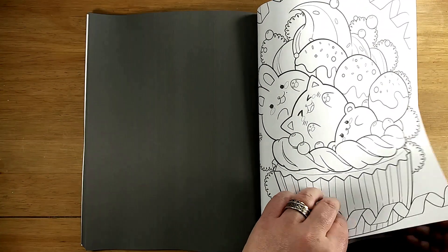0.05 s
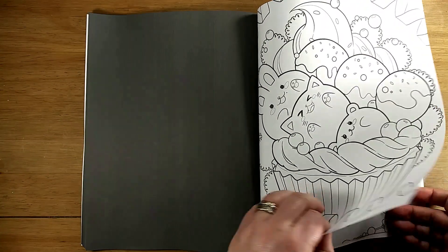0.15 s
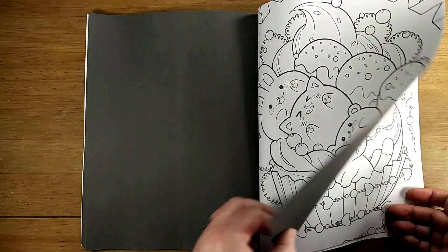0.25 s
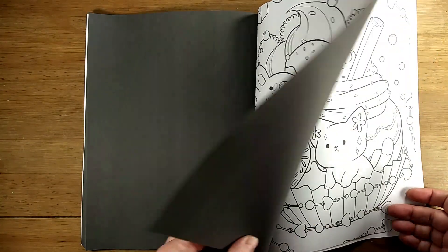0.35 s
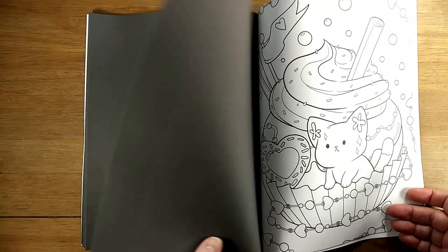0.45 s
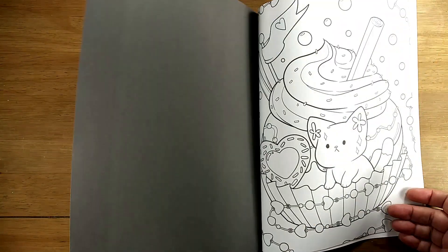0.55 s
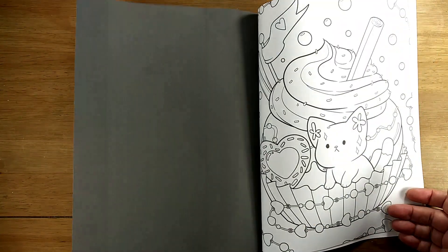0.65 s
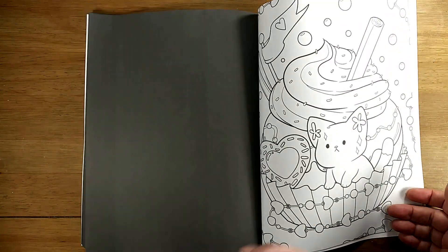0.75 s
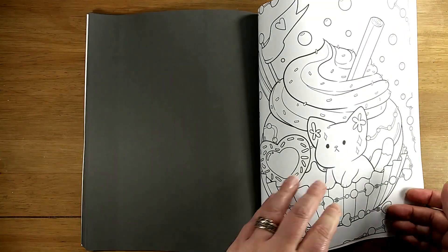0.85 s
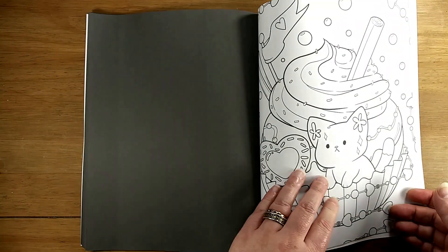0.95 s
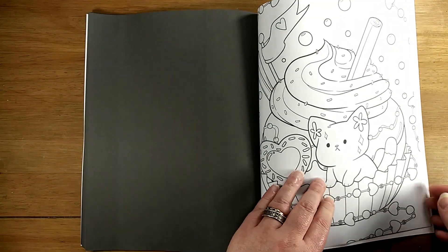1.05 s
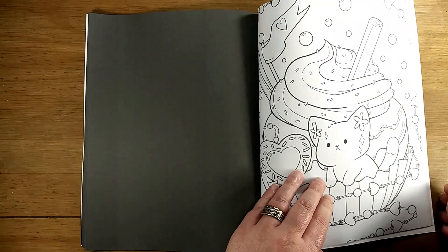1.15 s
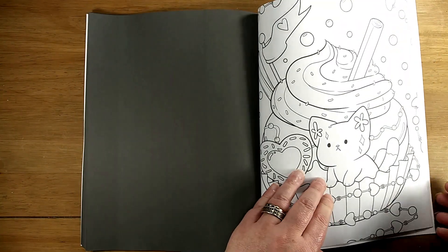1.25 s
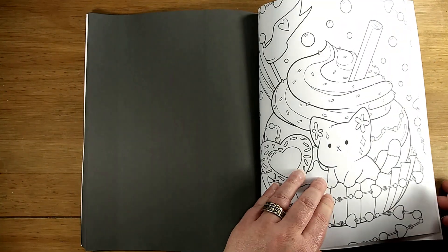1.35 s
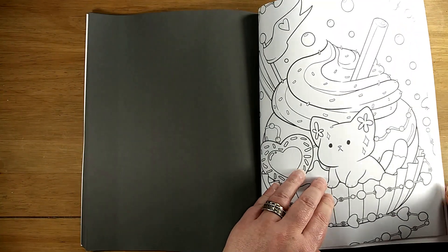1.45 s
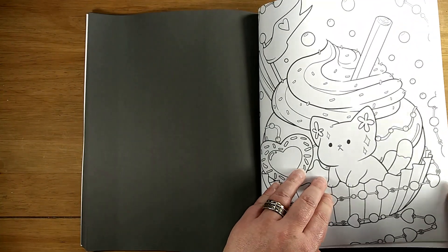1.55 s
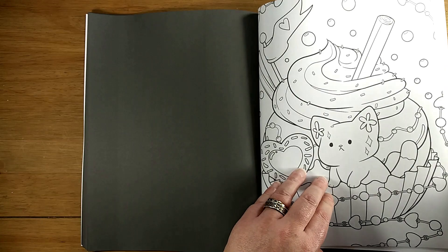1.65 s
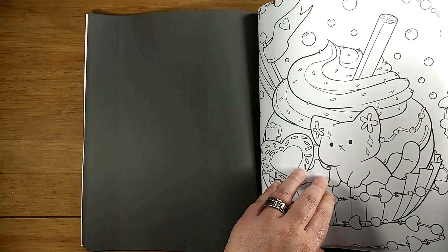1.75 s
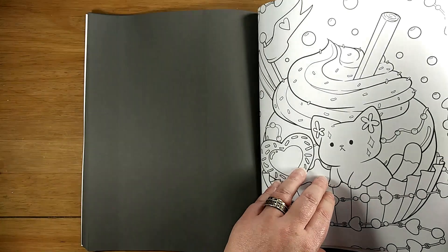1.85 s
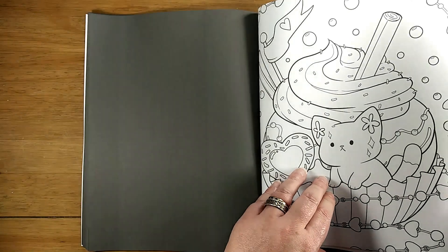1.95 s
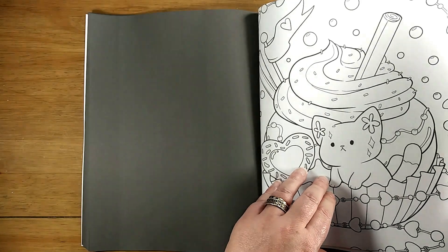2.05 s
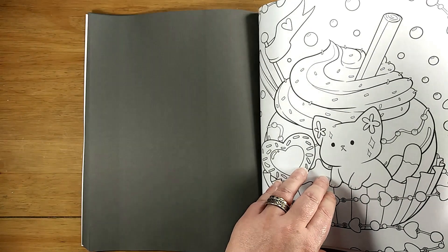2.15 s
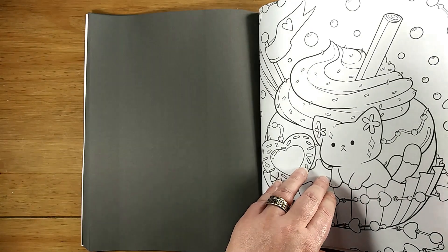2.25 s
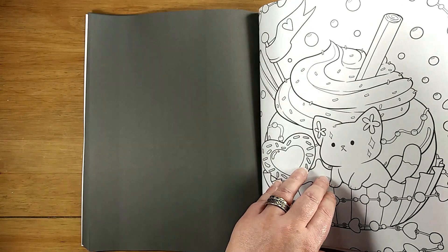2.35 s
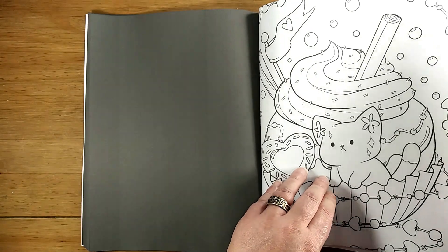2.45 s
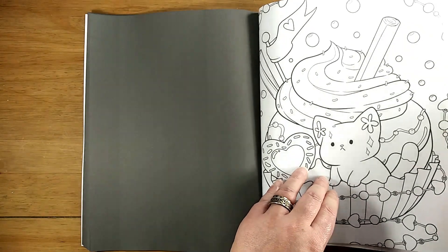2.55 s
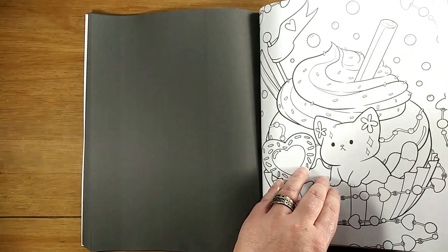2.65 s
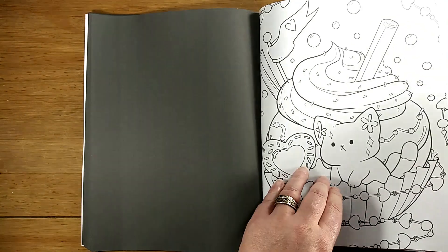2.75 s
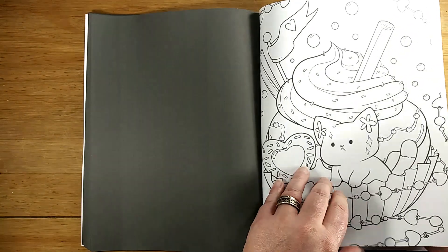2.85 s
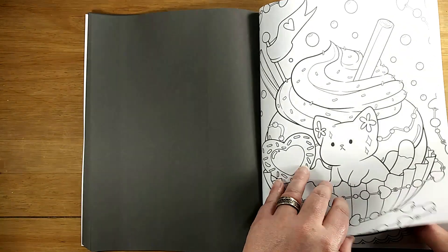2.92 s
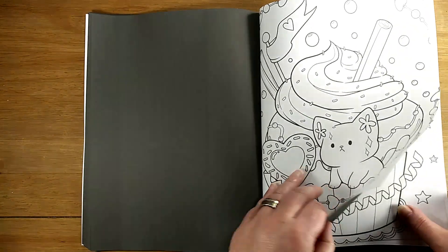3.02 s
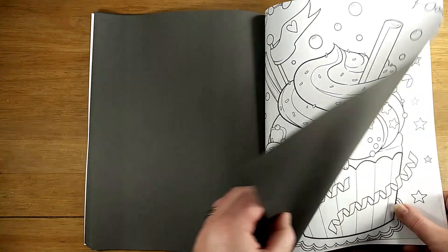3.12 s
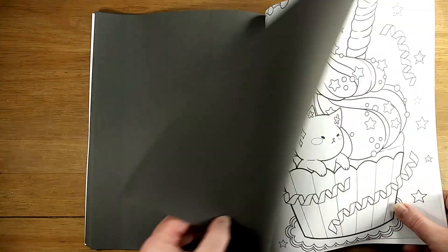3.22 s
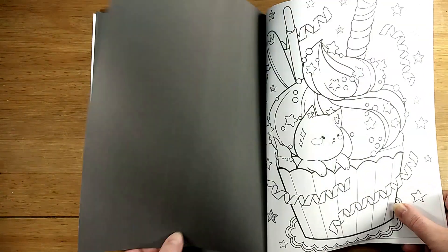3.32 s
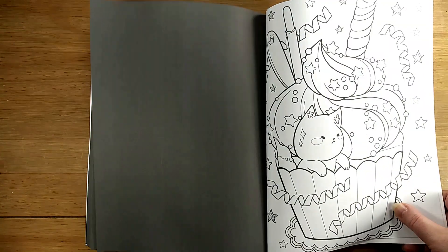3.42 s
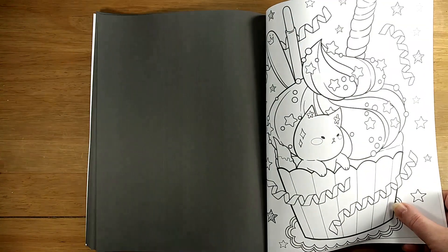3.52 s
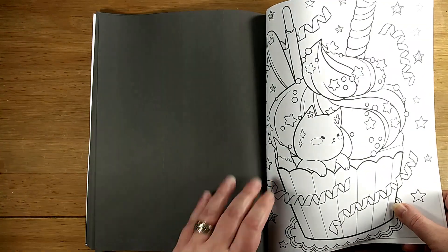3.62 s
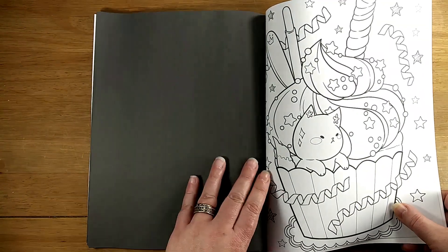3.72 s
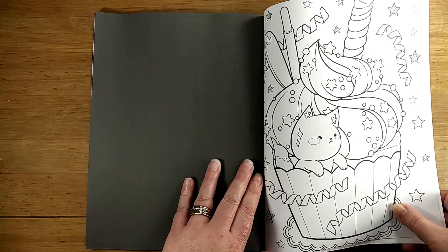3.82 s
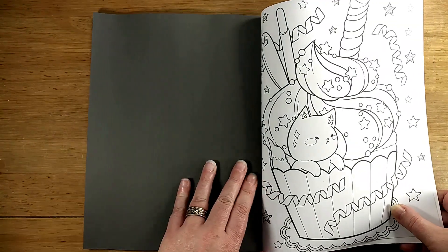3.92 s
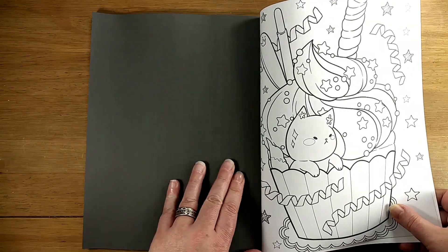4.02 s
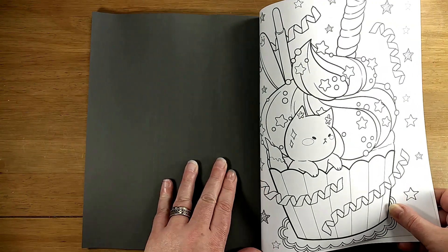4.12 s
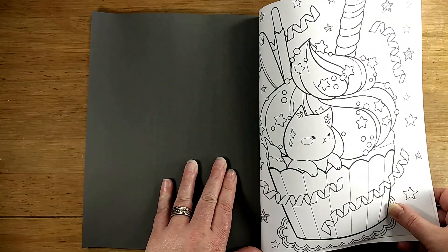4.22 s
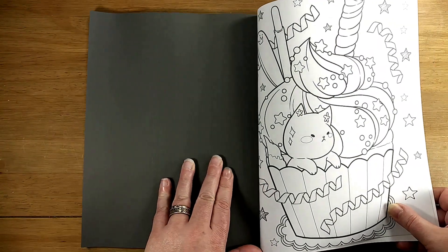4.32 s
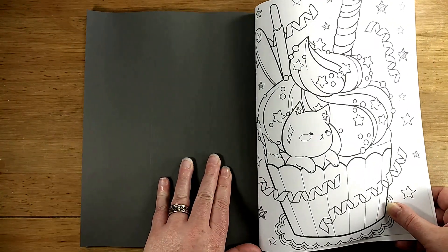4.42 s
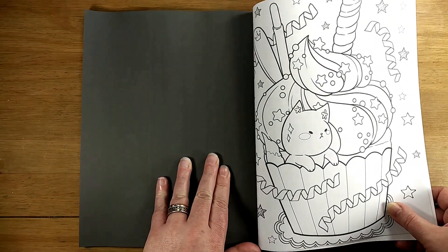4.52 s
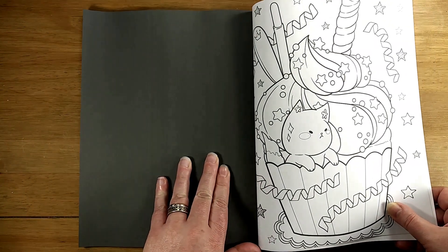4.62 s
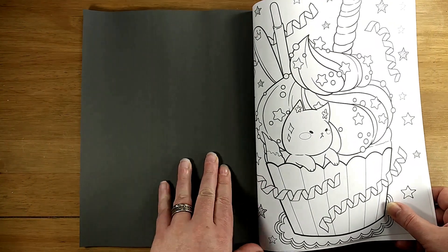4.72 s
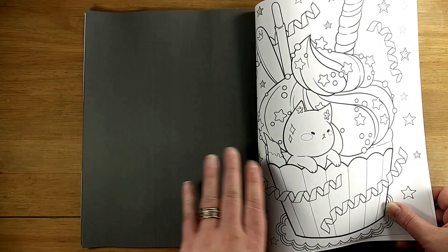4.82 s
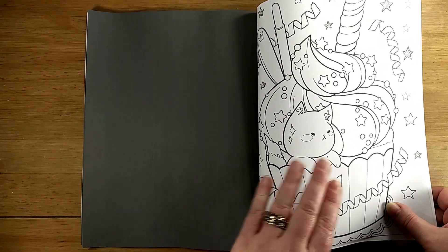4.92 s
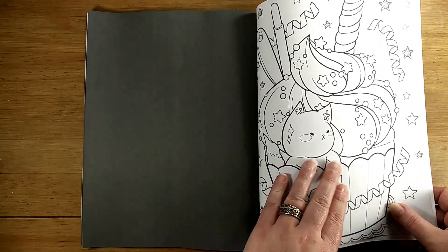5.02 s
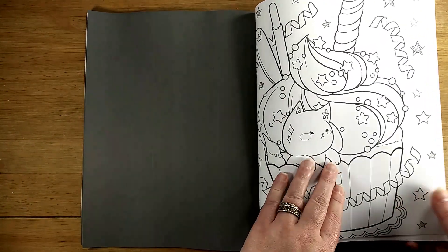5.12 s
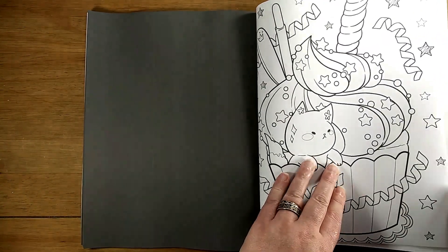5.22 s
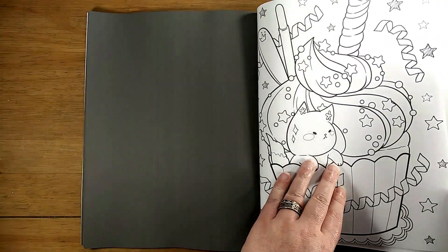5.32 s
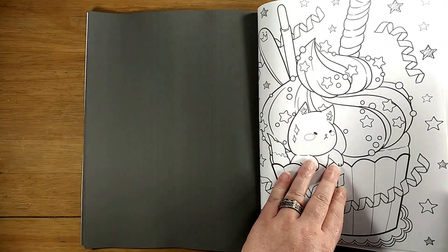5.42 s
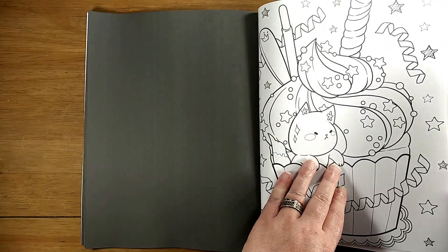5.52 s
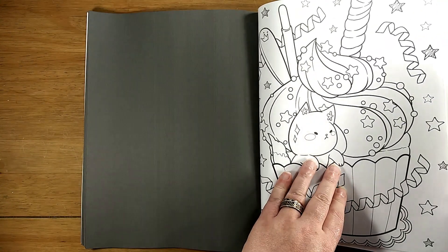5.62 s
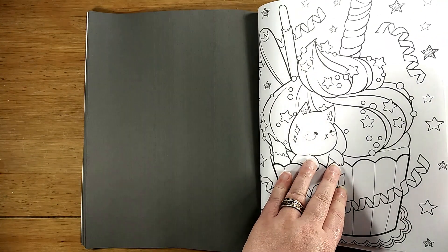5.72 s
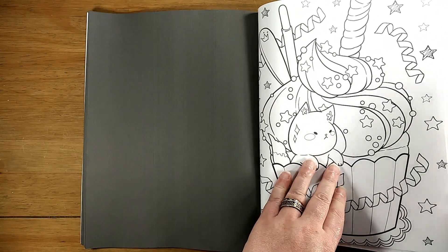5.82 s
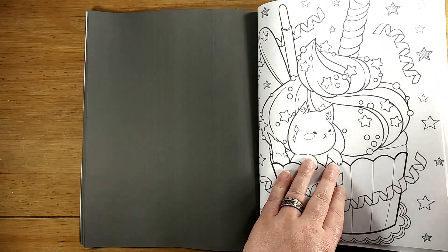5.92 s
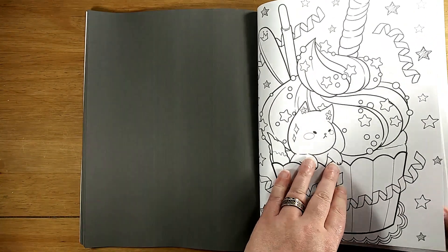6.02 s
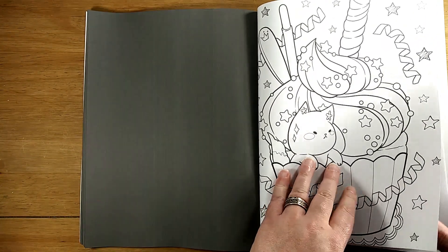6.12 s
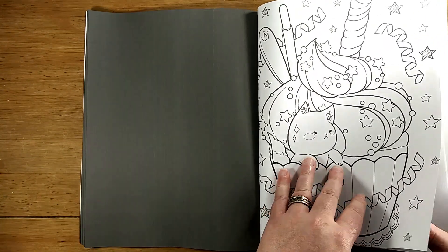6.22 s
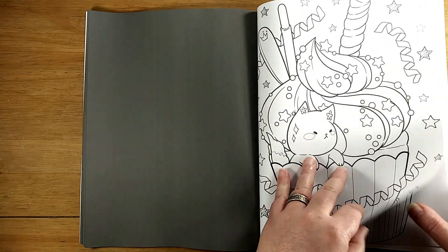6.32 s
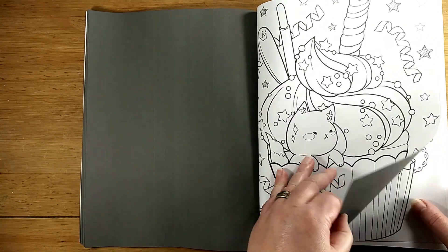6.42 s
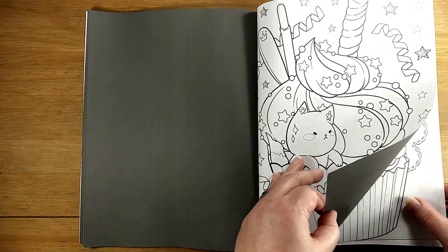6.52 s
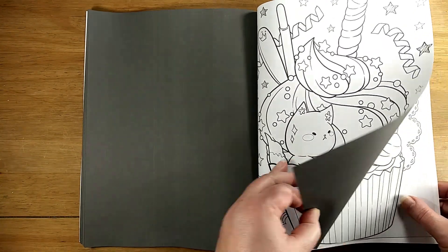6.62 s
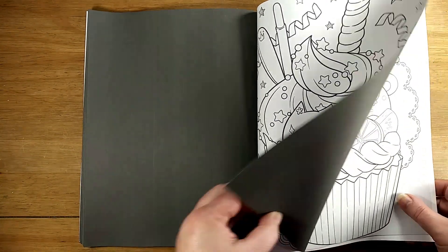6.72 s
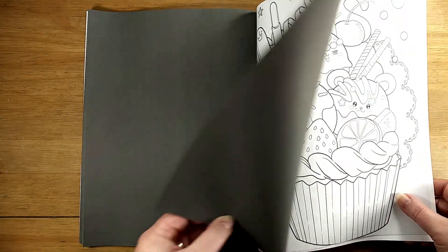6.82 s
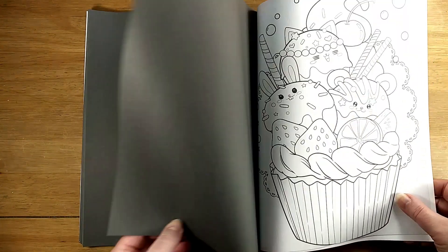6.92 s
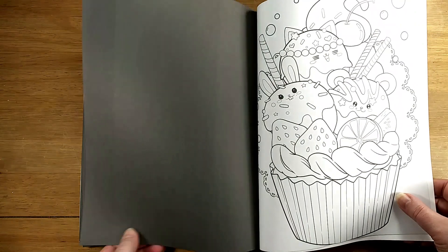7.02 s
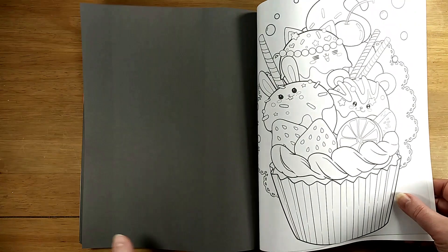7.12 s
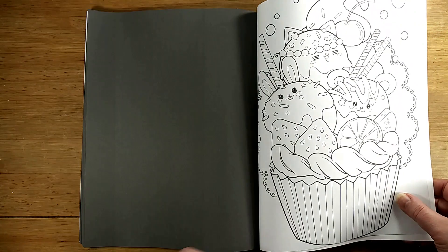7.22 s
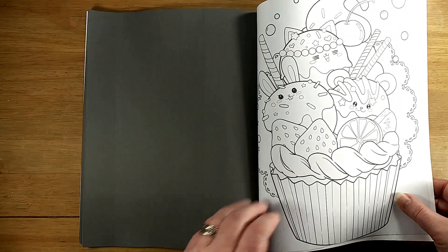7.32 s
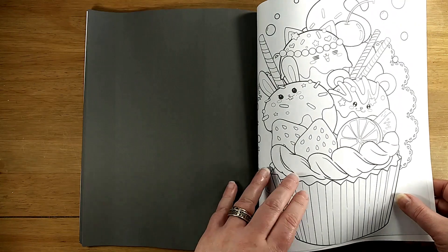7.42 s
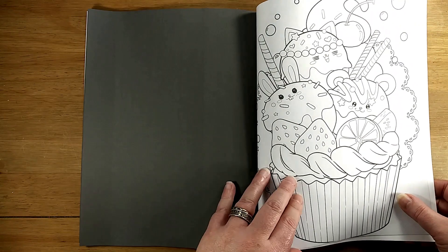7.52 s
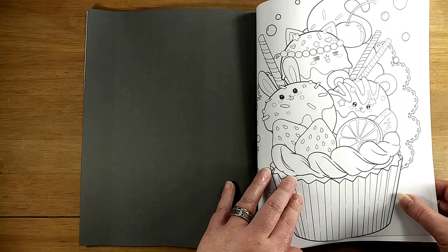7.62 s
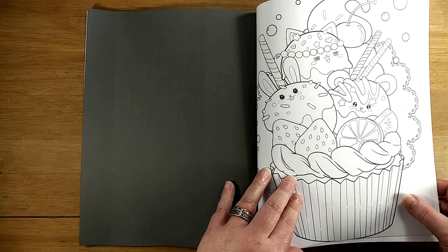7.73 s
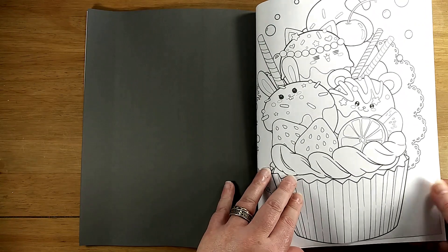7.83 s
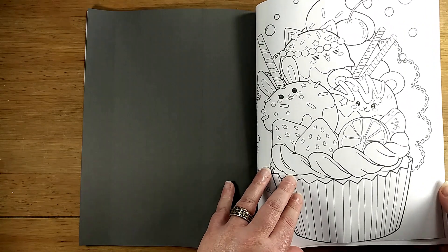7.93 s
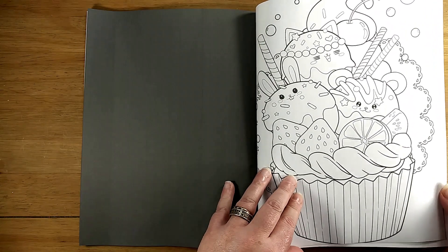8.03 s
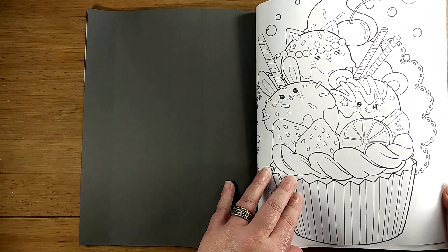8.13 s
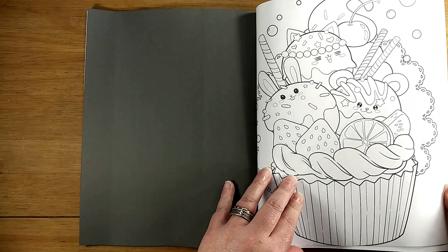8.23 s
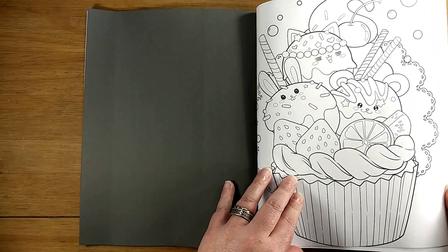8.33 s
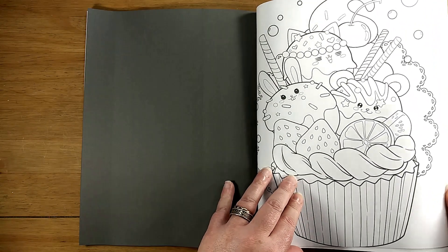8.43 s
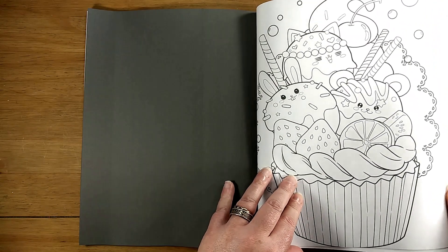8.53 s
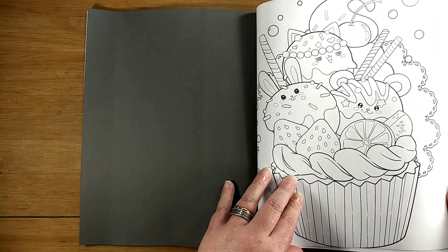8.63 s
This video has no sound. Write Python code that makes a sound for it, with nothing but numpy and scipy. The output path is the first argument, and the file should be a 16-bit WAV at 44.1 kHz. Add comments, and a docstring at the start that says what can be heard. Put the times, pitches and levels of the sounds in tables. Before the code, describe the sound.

Someone turns three pages of a paperback on a wooden table. Each sheet slides with a papery hiss, scrapes at its edge and pops lightly as it bends. The second is the loudest and lands with a sharp slap. Between turns, fingers softly tap and smooth the paper. The microphone is close above the book, in a quiet room with a faint steady hiss.

```python
"""Three paperback pages are turned by hand, on a wooden table in a quiet room.
Each sheet rumbles as it bends, hisses as it slides on its neighbour and fizzes where an edge or a finger
scrapes. It pops when it buckles, the second one lands with a slap, and fingers tap and smooth the paper
between turns. The table rings faintly; underneath lie room tone and a thin electrical ticking."""
import sys
import numpy as np
from scipy import signal
from scipy.fft import rfft, irfft
from scipy.io import wavfile
from scipy.ndimage import map_coordinates

SR = 44100
rng = np.random.default_rng(int(sys.argv[2]) if len(sys.argv) > 2 else 0)


def output_pcm(signal):
    """Save a mono or channel-first signal as 16-bit PCM at the path in sys.argv[1].

    Samples are clipped to [-1, 1] before scaling.
    """
    pcm = np.clip(np.atleast_2d(signal).T, -1, 1) * 32767
    wavfile.write(sys.argv[1], SR, np.round(pcm).astype(np.int16))


N = 381906
TIME = np.arange(N) / SR

# tone of paper sliding on paper: (frequency [Hz], relative level [dB])
SLIDE_TONE = [(100, -61), (500, -16), (1400, -1.5), (2200, 2), (3500, 0), (4700, 4.5), (6200, -7),
              (8000, -20), (15000, -25)]


def sheet(pull_db=1.5, flap_db=1.7, catch_db=0.2):
    """The turning page: bending, sliding and edge scraping, all under the uneven pull of the hand."""
    bend_db, slide_db, scrape_db, centre_hz = handling()
    rumble, hiss, fizz = bending(bend_db), sliding(slide_db, centre_hz), scraping()
    paper = (rumble * gain_of(bend_db + flap_db * wander(rate=160))
             + hiss * gain_of(slide_db + catch_db * wander(rate=210))
             + fizz * gain_of(scrape_db))
    return paper * gain_of(pull_db * wander(rate=16.6))


def handling():
    """The hand's moves as curves: bend, slide and scrape levels in dB, and the hiss centre in Hz."""
    # long glides over the next sheet, a curve each: (time [s], slide [dB], scrape [dB], centre [Hz])
    glides = [
        [(0.045, -67, -72, 2990), (0.073, -49.5, -67, 2600), (0.127, -51, -63, 2900), (0.179, -53.5, -68, 2660),
         (0.239, -45, -58.5, 3270), (0.301, -47, -64, 2700), (0.343, -47.5, -69, 3300), (0.397, -47, -61, 3020),
         (0.489, -46, -46.5, 4400), (0.547, -42.5, -50.5, 4350), (0.587, -57, -70, 3840), (0.6, -67, -78, 3160)],
        [(2.51, -68, -77, 3090), (2.556, -64, -77, 4080), (2.588, -43.5, -58, 4190), (2.636, -49, -60.5, 4030),
         (2.66, -42, -59, 4000), (2.678, -48, -60, 3960), (2.702, -38, -57.5, 3730), (2.774, -47.5, -69, 3240),
         (2.816, -43.5, -74, 3170), (2.86, -39.5, -63, 2980), (2.902, -40, -49.5, 3070),
         (2.925, -50, -70, 3230)],
        [(5.85, -71, -79, 3430), (5.854, -70, -86, 3430), (5.906, -61, -77, 4200), (5.92, -49, -66, 4150),
         (5.976, -52, -66, 4300), (6.022, -56.5, -70, 3690), (6.044, -39, -57, 3680), (6.078, -47.5, -63, 4160),
         (6.126, -47.5, -69, 3600), (6.184, -48, -69, 4140), (6.204, -57.5, -71, 3850),
         (6.265, -58.5, -81, 4020)],
        [(6.85, -58, -72, 3010), (6.866, -66, -81, 3100), (6.89, -52.5, -73, 3450), (6.906, -49.5, -69, 3820),
         (6.948, -45.5, -52, 4070), (6.988, -48.5, -59, 3910), (7.028, -45, -49, 3630),
         (7.104, -43.5, -59, 4050), (7.132, -68, -77, 4070), (7.144, -63, -74, 4130), (7.16, -76, -89, 3960),
         (7.17, -74, -79, 3830)],
    ]
    # a sheet is picked up or settles: (start [s], length [s], hiss [dB], swell [dB], centre [Hz])
    slips = [(0.785, 0.099, -69, -5, 3200), (1.4, .012, -61, 0, 3800), (1.481, 0.1, -65.5, -1, 2600),
             (1.625, 0.086, -60.5, -1.5, 4200), (2.925, 0.079, -49, -17, 2930),
             (2.985, 0.094, -54.5, 5, 3000), (3.151, 0.06, -53.5, 3, 4050), (3.213, 0.11, -59.5, -3, 3600),
             (3.315, .012, -50, 4, 3970), (3.597, 0.045, -64.5, -5, 4250), (5.13, 0.079, -64, 5, 4300),
             (5.202, .1, -68.5, -13, 4330), (6.262, 0.057, -49, 22.5, 3200),
             (6.332, 0.038, -45.5, -15, 4120), (6.379, 0.015, -48, 0.5, 4170),
             (6.403, 0.052, -53, 20, 3930), (6.73, .025, -64, 0, 2700), (6.758, 0.062, -52.5, -1.5, 3640),
             (8.15, 0.042, -62.5, 0, 4030)]
    # fingers smooth the page: (start [s], length [s], hiss [dB], swell [dB], centre [Hz], rumble [dB])
    rubs = [(0.981, 0.03, -63.5, 11, 2400, -66.5), (1.019, 0.097, -54.5, -6, 4360, -59.5),
            (3.706, 0.032, -46.5, 11.5, 4860, -48.5), (3.75, 0.055, -61.5, -2, 4070, -59.5),
            (3.799, 0.046, -52, -8, 4720, -54), (3.901, 0.077, -65, 5, 2400, -61.5),
            (3.968, 0.021, -58, 6, 4200, -57), (4, 0.13, -52, -4.5, 2180, -49),
            (4.137, 0.27, -73.5, -3.5, 1590, -66.5), (4.689, 0.15, -68, -6, 2960, -73),
            (5.051, 0.018, -58, 6.5, 3500, -62), (5.092, .018, -60.5, 3, 4500, -69),
            (7.45, 0.037, -62, 9, 4200, -64), (7.77, .045, -63.5, -1, 3160, -75)]
    # the lifted sheet is curled over: (start [s], length [s], rumble [dB], swell [dB], hiss [dB])
    flexes = [(-0.035, 0.046, -45, 0.5, -48.5), (2.489, 0.14, -58, -3, -62), (2.82, 0.12, -60.5, 2, -66),
              (3.058, 0.067, -45.5, 0, -46), (6.449, 0.12, -41, 9, -46.5), (6.575, 0.12, -39.5, 16, -43)]
    # a falling sheet presses the air out: (start [s], length [s], rumble [dB], hiss [dB], fade [dB/s])
    landings = [(0.572, 0.126, -41.5, -72, 220), (3.3329, 0.074, -35, -30.5, 251)]
    power = contact(np.ones(N), -84, -84, -84, hz=3000)  # the paper at rest
    for glide in glides:
        times, *columns = np.transpose(glide)
        t = np.arange(times[0], times[-1], 1 / SR)
        hiss_db, edge_db, hz = (np.interp(t, times, column) for column in columns)
        add(power, times[0], contact(0.86, hiss_db - 12.5, hiss_db - 0.5, edge_db + 4.5, hz))
    for start, length, hiss_db, swell_db, hz in slips:
        shape = stroke(length, swell_db, attack_s=0.018, release_s=0.0065)
        add(power, start, contact(shape, hiss_db - 12.5, hiss_db, hiss_db - 9.5, hz))
    for start, length, hiss_db, swell_db, hz, rumble_db in rubs:
        shape = stroke(length, swell_db, attack_s=0.017, release_s=0.014)
        add(power, start, contact(shape, rumble_db, hiss_db, hiss_db - 2, hz))
    for start, length, rumble_db, swell_db, hiss_db in flexes:
        shape = stroke(length, swell_db, attack_s=0.066, release_s=0.012)
        add(power, start, contact(shape, rumble_db, hiss_db, hiss_db - 6, hz=2810))
    for start, length, rumble_db, hiss_db, fade in landings:
        shape = stroke(length, -fade * length, attack_s=0.0019, release_s=0.0089)
        add(power, start, contact(shape / shape.max(), rumble_db, hiss_db, hiss_db - 5, hz=3600))
    bend_db, slide_db, scrape_db = 10 * np.log10(power[:3])
    return bend_db, slide_db, scrape_db, power[3] / power[1]


def contact(shape, bend_db, slide_db, scrape_db, hz):
    """Bend, slide and scrape power of one move, and its hiss centre weighted by the slide power."""
    bend, slide, scrape = ((shape * gain_of(db)) ** 2 for db in (bend_db, slide_db, scrape_db))
    return np.array([bend, slide, scrape, slide * hz])


def friction(slips_per_s, spread_db, smooth_db):
    """Fibres catch and slip: clicks of uneven size over a smooth rub."""
    size = gain_of(spread_db * np.minimum(rng.exponential(1, N), 4))
    clicks = size * rng.choice([-1, 1], N) * (rng.random(N) < slips_per_s / SR)
    return evened(evened(clicks) + gain_of(smooth_db) * rng.standard_normal(N))


def bending(bend_db):
    """A bending sheet rumbles; the harder it is curled, the hollower it rings."""
    # tone of the rumble: (frequency [Hz], relative level [dB])
    bend_tone = [(40, -40), (110, -24.5), (190, -12.5), (340, -1.5), (550, 1.5), (800, -1), (1250, -1),
                 (1700, 1.5), (2600, -13), (6000, -33.5)]
    rumble = coloured(friction(slips_per_s=900, spread_db=0.5, smooth_db=4), bend_tone)
    hollow = coloured(friction(slips_per_s=600, spread_db=-1.5, smooth_db=4.5), bend_tone)
    hollow = evened(without_bass(narrowed(hollow, hz=930, width=850), hz=447))
    return blend(rumble, hollow, b_db=3 + 0.44 * (bend_db + 48.5))


def sliding(slide_db, centre_hz):
    """The hiss favours one band, which moves as the contact travels along the sheet."""
    broad = coloured(friction(slips_per_s=2500, spread_db=-4.5, smooth_db=-5.5), SLIDE_TONE)
    grain = coloured(friction(slips_per_s=2000, spread_db=8.5, smooth_db=2), SLIDE_TONE)
    band = narrowed(grain, centre_hz, width=1450)
    band_db = np.minimum(4.5 + 0.22 * (slide_db + 17), 5)  # louder slides are more focused
    return table_mirror(blend(broad, band, band_db))


def table_mirror(x, delay_s=0.0022, sway=0.121):
    """The table mirrors the raised sheet; as the sheet sways, ripples drift through its hiss."""
    lag_s = delay_s * np.exp(sway * wander(rate=2.85))
    mirrored = map_coordinates(x, [(TIME - lag_s) * SR], order=3)
    return evened(x + 0.5 * mirrored)


def scraping():
    """An edge or a finger scrapes the paper with a bright fizz."""
    # tone of the fizz: (frequency [Hz], relative level [dB])
    scrape_tone = [(200, -48), (3000, -5), (5000, 9), (6400, 8), (8000, 0), (10200, 4), (12500, -1),
                   (16000, -7.5)]
    return coloured(friction(slips_per_s=1000, spread_db=1, smooth_db=2), scrape_tone)


def rim_drags():
    """The lifted rim sticks and slips over the page below, and each slip rings the taut sheet."""
    # drags of the rim: (start [s], peak [s], end [s], level [dB], first pitch [Hz], last pitch [Hz])
    drags = [(0.345, 0.420, 0.55, -46.5, 2760, 3500), (2.805, 2.868, 2.91, -36.5, 3120, 2730),
             (6.290, 6.32, 6.326, -40, 2490, 2880)]
    level, hz = np.zeros(N), np.full(N, drags[0][4], float)
    for start, peak, end, db, first_hz, last_hz in drags:
        level += gain_of(db) * np.interp(TIME, [start, peak, end], [0, 1, 0])
        hz = np.where(TIME >= start, np.interp(TIME, [start, end], [first_hz, last_hz]), hz)
    rasp = coloured(friction(slips_per_s=880, spread_db=13, smooth_db=3), SLIDE_TONE)
    return level * narrowed(rasp, hz, width=900)


def impacts(sag=0.38, sag_s=0.0017, thud_rise_s=0.0006, size=6000):
    """Each slap, pop or tap is a crack plus a short thud whose pitch sinks as the paper slackens."""
    # tone of the crack: (frequency [Hz], relative level [dB])
    crack_tone = [(50, -73), (130, -9), (300, 6.5), (1000, 9.5), (2700, 1), (4800, 0.5), (6500, -8.5),
                  (8000, -15.5), (10500, -11), (16000, -27)]
    hits = [slap(), *buckles(), *finger_taps()]
    thuds, cracks = np.zeros(N), np.zeros(N)
    t = np.arange(size) / SR
    cycles_per_hz = t * (1 - sag / 2) + 2 * sag * sag_s * (1 - np.exp(-t / sag_s))
    for start, modes, crack_db, crack_t60, crack_rise in hits:
        for hz, db, t60 in modes:
            tone = np.sin(2 * np.pi * hz * cycles_per_hz)
            add(thuds, start, gain_of(db) * strike(t, thud_rise_s, t60) * tone)
        grit = rng.standard_normal(size)
        add(cracks, start, gain_of(crack_db) * strike(t, crack_rise, crack_t60) * grit)
    return without_bass(thuds, hz=204) + coloured(cracks, crack_tone)  # small patches radiate little bass


def slap(start=3.333, crack_db=-10.5, crack_t60_s=0.0071, crack_rise_s=0.0006):
    """The second sheet lands flat: one hard hit."""
    # body of the slap: (nominal pitch [Hz], level [dB], t60 [s])
    slap_modes = [(223, -35.5, 0.038), (418, -28, 0.061), (880, -17, 0.0095), (1260, -20.5, 0.022),
                  (2660, -16, 0.01)]
    return start, slap_modes, crack_db, crack_t60_s, crack_rise_s


def buckles(crack_t60_s=0.016, crack_rise_s=0.00093):
    """The sheet buckles: a patch of paper snaps through with a pop."""
    # pops of the sheet: (time [s], thud [dB], nominal pitch [Hz], crack [dB])
    pops = [(0.130, -31.5, 1540, -35), (0.579, -35, 900, -54), (0.582, -33, 358, -55),
            (0.604, -32.5, 870, -45), (2.7002, -20.5, 680, -33.5), (2.862, -40, 2760, -55),
            (2.8815, -18.5, 2700, -47), (3.029, -30.5, 730, -39.5), (3.043, -35, 784, -36),
            (3.088, -32.5, 1110, -38), (6.335, -47, 4200, -46), (6.388, -47, 1340, -60),
            (6.5041, -49, 960, -31), (6.6573, -18.5, 750, -40), (6.7689, -31, 840, -34),
            (6.7755, -40, 970, -34)]
    for start, db, hz, crack_db in pops:
        yield start, patch_modes(hz, db, t60=0.018), crack_db, crack_t60_s, crack_rise_s


def finger_taps(crack_t60_s=0.016, crack_rise_s=0.00085, soft_hz=510):
    """A fingertip hits the page and thumps the whole book, the more the softer and lower the tap."""
    # fingers come down: (time [s], thud [dB], nominal pitch [Hz], crack [dB])
    taps = [(0.9945, -38.5, 595, -54), (1.121, -51, 600, -44.5), (1.254, -34, 500, -36),
            (1.433, -26.5, 2810, -32.5), (1.436, -27, 1126, -38.5), (1.528, -49, 1430, -51),
            (3.7239, -22.5, 1575, -30), (3.9236, -39, 1310, -33.5), (4.206, -47, 710, -48),
            (4.516, -48, 655, -67), (4.717, -53, 1900, -62), (4.785, -46, 680, -51),
            (4.832, -49, 1690, -42.5), (5.04, -46, 630, -46), (5.069, -38, 530, -36.5),
            (5.077, -38, 590, -54), (5.2107, -33, 3920, -42), (7.2, -49, 4150, -57),
            (7.272, -51, 4380, -58), (7.455, -45, 4470, -61), (7.488, -43, 790, -53),
            (7.5141, -28.5, 530, -34), (7.788, -44, 1940, -49.5), (7.917, -49, 744, -44),
            (7.932, -58, 960, -46)]
    for start, db, hz, crack_db in taps:
        thump_db = db - 9 * np.log2(hz / soft_hz)
        book_modes = [(232, thump_db - 20, 0.043), (362, thump_db - 13.5, 0.029)]
        yield start, patch_modes(hz, db, t60=0.014) + book_modes, crack_db, crack_t60_s, crack_rise_s


def patch_modes(hz, db, t60, most_cycles=20):
    """A patch rings and the wider sheet follows, lower and softer; high modes die soonest."""
    modes = [(hz, db, t60), (hz * 0.569, db - 13, 0.02)]
    return [(pitch, level, min(ring_s, most_cycles / pitch)) for pitch, level, ring_s in modes]


def edge_zings():
    """The edge sings briefly as it skims the page, chattering in one high band."""
    # skims of the edge: (start [s], length [s], level [dB], centre [Hz])
    zings = [(2.562, 0.037, -55.5, 9200), (6.917, 0.044, -48.5, 10200)]
    out = np.zeros(N)
    for start, length, db, hz in zings:
        shape = stroke(length, swell_db=0, attack_s=0.03, release_s=0.01)
        chatter = narrowed(rng.standard_normal(N), hz, width=2200)
        add(out, start, gain_of(db) * shape * chatter[:len(shape)])
    return out


def air_wafts():
    """The swinging sheet sends soft, deep pushes of air at the microphone."""
    # pushes of air: (start [s], length [s], level [dB])
    wafts = [(3.322, .035, -82), (6.63, .035, -71)]
    level = np.zeros(N)
    for start, length, db in wafts:
        add(level, start, gain_of(db) * stroke(length, swell_db=0, attack_s=0.016, release_s=0.014))
    return level * wander(rate=75)


def room(x, tail_db=-17, predelay_s=0.005):
    """The table rings, near surfaces reflect, and a short tail dies band by band."""
    # resonances of the table and the space over it: (frequency [Hz], width [Hz], level [dB])
    rings = [(214, 8.7, -13.5), (361, 17, -13.5), (414, 18, -4), (688, 35, -7.5), (834, 23, -7),
             (1158, 14, -3.5), (1550, 4.7, -12), (2220, 31, -6.5), (2700, 12, -14), (2930, 17, -2),
             (3020, 3, -12), (3620, 94, -7), (4170, 26, -14)]
    # early reflections: (delay [s], level [dB])
    echoes = [(.0021, -69), (.0037, -28), (.0069, -19), (.0098, -32)]
    # decay of the tail: (frequency [Hz], t60 [s])
    decays = [(200, 0.38), (1000, 0.044), (4000, 0.099), (12000, 0.033)]
    near = x + sum(gain_of(db) * resonate(x, hz, width) for hz, width, db in rings)
    out = near.copy()
    for delay, db in echoes:
        add(out, delay, gain_of(db) * near)
    hz, t, bands = signal.stft(rng.standard_normal(16384), SR, nperseg=256)
    fade = np.exp(-np.log(1000) * t / read(decays, hz)[:, None])
    _, tail = signal.istft(bands * fade, SR)
    add(out, predelay_s, gain_of(tail_db) * signal.oaconvolve(near, tail / np.linalg.norm(tail)))
    return out


def room_tone(level_db=-66.5):
    """A steady bed of room noise and microphone hiss."""
    # tone of the bed: (frequency [Hz], relative level [dB])
    air_tone = [(25, -23), (100, -22), (150, -12.5), (210, -2), (330, 0.5), (650, -1), (1000, -4.5),
                (2000, -8.5), (4200, -11.5), (6000, -24.5), (7600, -26), (8700, -23.5), (9500, -17),
                (15800, -17)]
    return gain_of(level_db) * evened(coloured(rng.standard_normal(N), air_tone))


def ticking(ticks_per_s=60, decay_s=0.001, level_db=-82.5):
    """Faint electrical ticking in the hiss: short, even spits of high noise."""
    spits = np.exp(-(TIME % (1 / ticks_per_s)) / decay_s) * rng.standard_normal(N)
    return gain_of(level_db) * narrowed(spits, hz=10000, width=3500)


def stroke(length, swell_db, attack_s, release_s):
    """Envelope of one move: a smooth attack, a hold that swells or fades, a quick release."""
    t = np.arange(0, length + 8 * release_s, 1 / SR)
    attack = np.sin(np.pi / 2 * np.minimum(t / attack_s, 1)) ** 2
    swell = gain_of(swell_db * (np.minimum(t / length, 1) - 0.5))
    release = np.exp(-np.maximum(t - length, 0) / release_s)
    return attack * swell * release


def strike(t, rise_s, t60):
    """Envelope of one hit: a fast rise and an exponential decay."""
    return (1 - np.exp(-t / rise_s)) * np.exp(-np.log(1000) * t / t60)


def wander(rate):
    """Smooth random drift of rms 1, rolling off above rate Hz."""
    rolloff = 1 + (np.fft.rfftfreq(N, 1 / SR) / rate) ** 4
    return evened(irfft(rfft(rng.standard_normal(N)) / rolloff, N))


def coloured(x, spectrum, size=2048):
    """Minimum-phase EQ of unit energy, so that clicks keep a sharp front."""
    log_gain = np.log(gain_of(read(spectrum, abs(np.fft.fftfreq(size, 1 / SR)))))
    impulse = np.fft.ifft(np.exp(np.conj(signal.hilbert(log_gain)))).real
    return signal.oaconvolve(x, impulse / np.linalg.norm(impulse))[:N]


def resonate(x, hz, width):
    """A resonance of gain 1, width in Hz, whose pitch can follow a curve."""
    carrier = np.exp(2j * np.pi * np.cumsum(hz * np.ones(N)) / SR)
    pole = np.exp(-np.pi * width / SR)
    return 2 * (carrier * signal.lfilter([1 - pole], [1, -pole], x / carrier + 1e-18)).real


def narrowed(x, hz, width):
    """Two resonances in a row: a band with steep sides, rms 1."""
    return evened(resonate(resonate(x, hz, width), hz, width))


def without_bass(x, hz):
    """Third-order low cut."""
    return signal.sosfilt(signal.butter(3, hz, "highpass", fs=SR, output="sos"), x)


def blend(a, b, b_db):
    """Mixes two unrelated sounds at constant power, b standing b_db over a."""
    return (a + gain_of(b_db) * b) / np.sqrt(1 + gain_of(b_db) ** 2)


def add(mix, start, sound):
    """Mixes a sound in at start seconds, along the last axis."""
    at = round(start * SR)
    sound = sound[..., max(-at, 0):]
    part = mix[..., max(at, 0):][..., :sound.shape[-1]]
    part += sound[..., :part.shape[-1]]


def read(points, hz):
    """Reads a table along log frequency."""
    freqs, values = np.transpose(points)
    return np.interp(np.log(hz + 1), np.log(freqs + 1), values)


def gain_of(db):
    """Decibels to amplitude."""
    return 10 ** (np.asarray(db) / 20)


def evened(x):
    """Scales to rms 1."""
    return x / np.sqrt(np.mean(x ** 2) + 1e-20)


def scene():
    """The book on its table, heard in mono from just above."""
    paper = sheet() + rim_drags() + impacts() + edge_zings()
    return (room(paper) + air_wafts() + room_tone() + ticking())[None]


def record(dry):
    """A steep high cut at 15850 Hz."""
    lowpass = signal.firwin(511, 15850, window=("kaiser", 9), fs=SR)
    return signal.oaconvolve(dry, lowpass[None], "same")


dry = scene()
out = record(dry)
output_pcm(out)
```